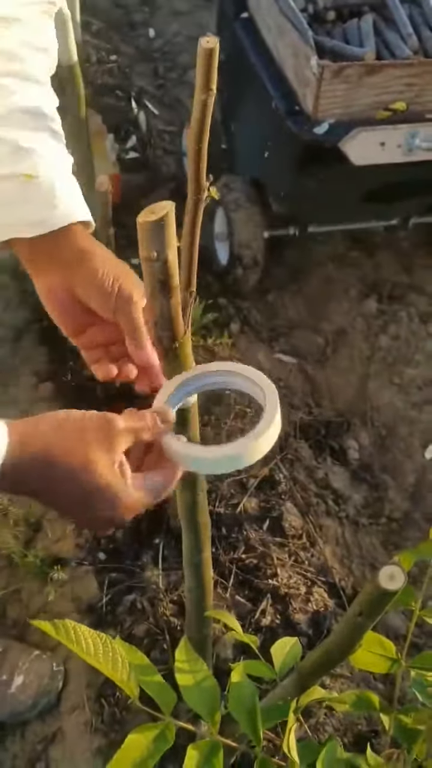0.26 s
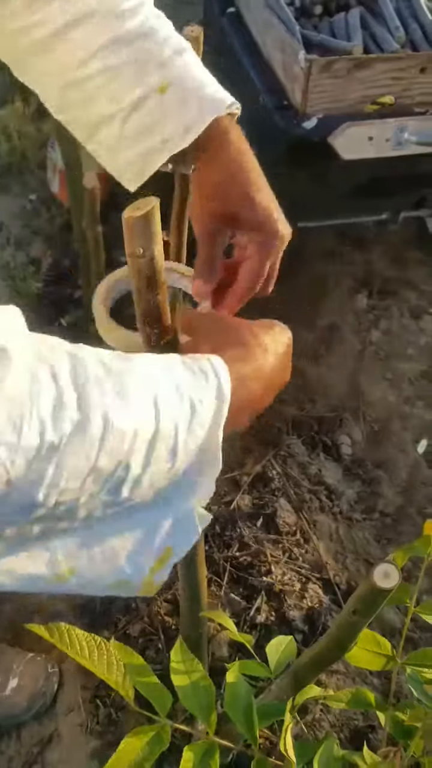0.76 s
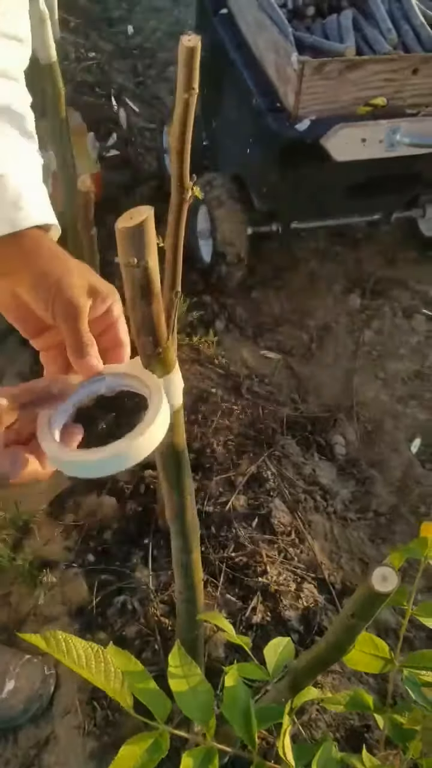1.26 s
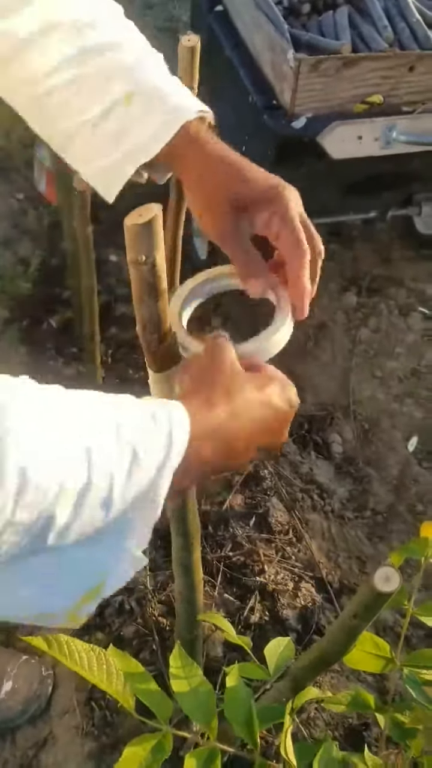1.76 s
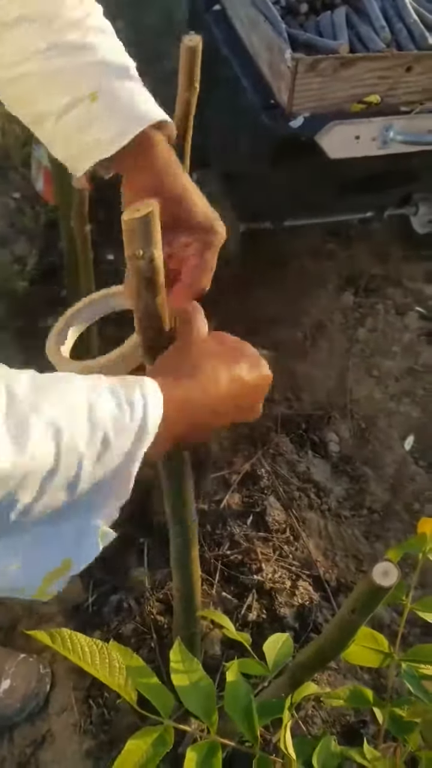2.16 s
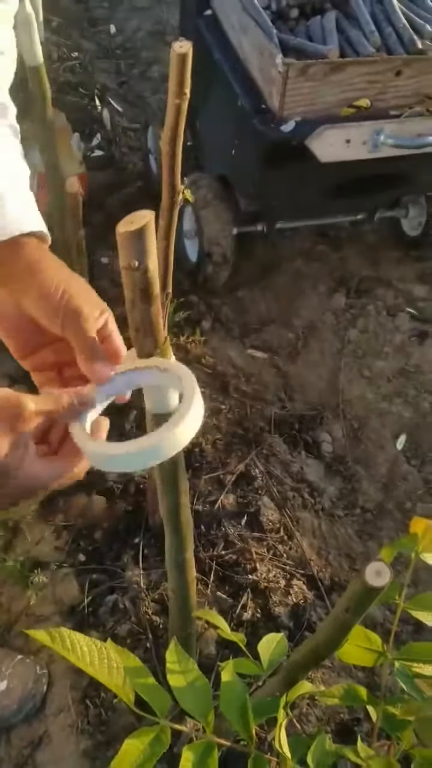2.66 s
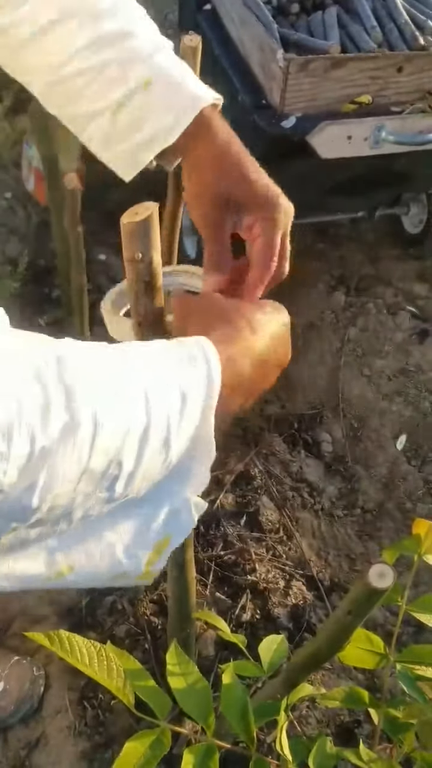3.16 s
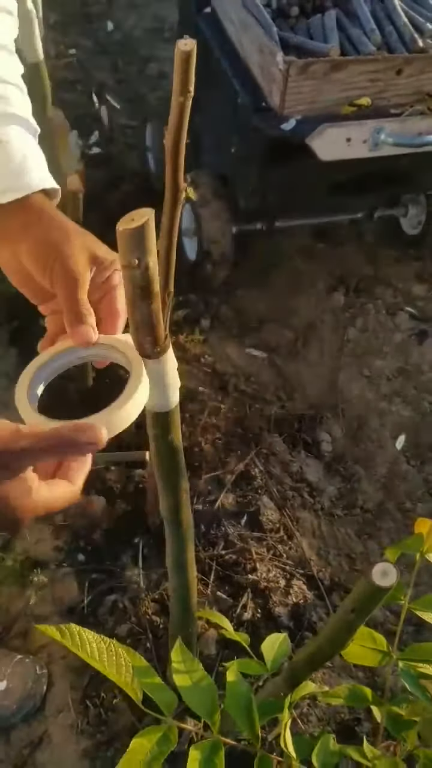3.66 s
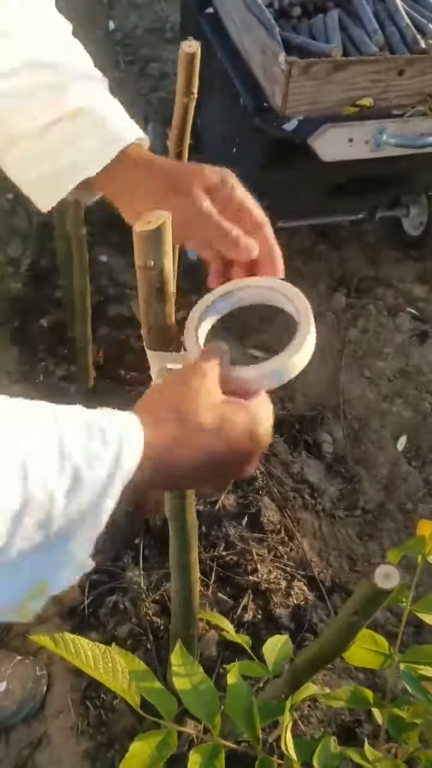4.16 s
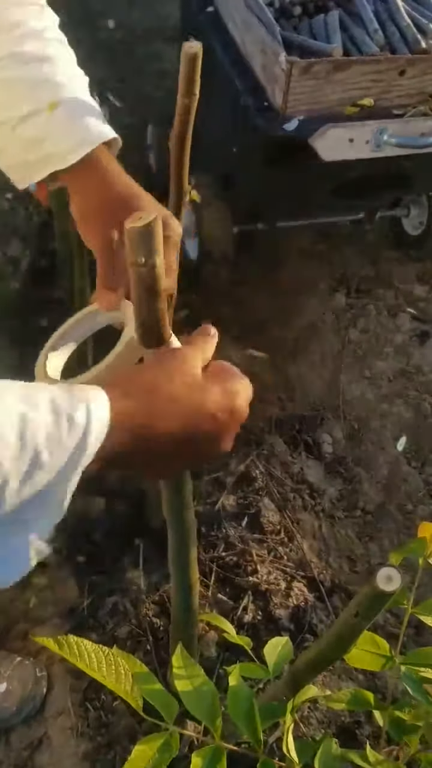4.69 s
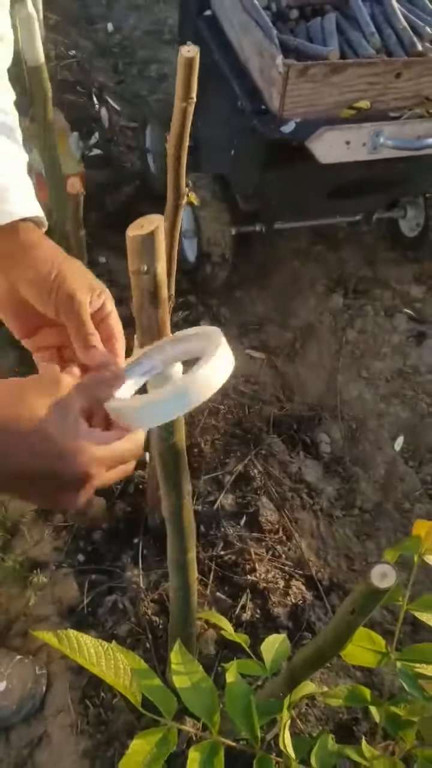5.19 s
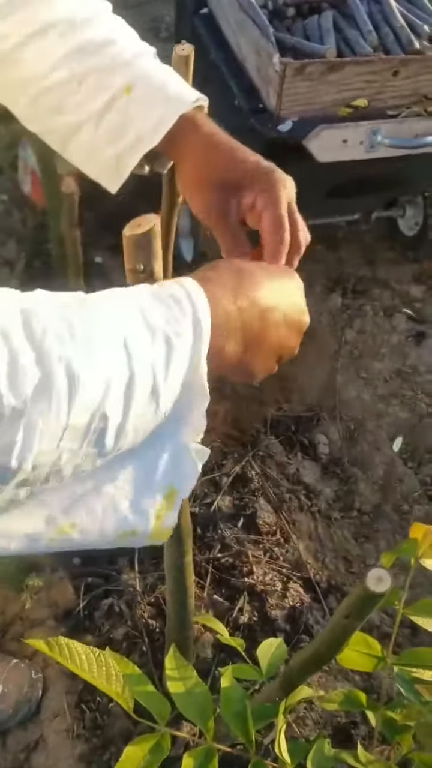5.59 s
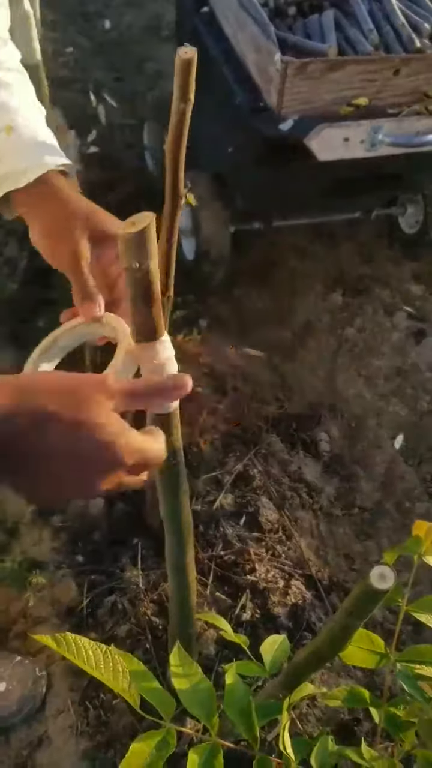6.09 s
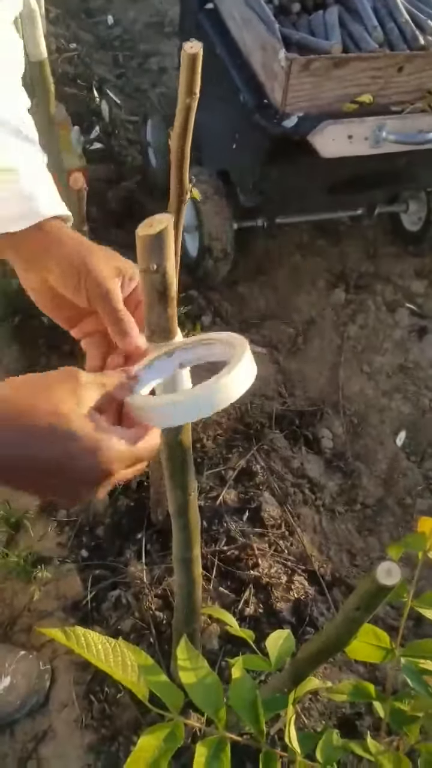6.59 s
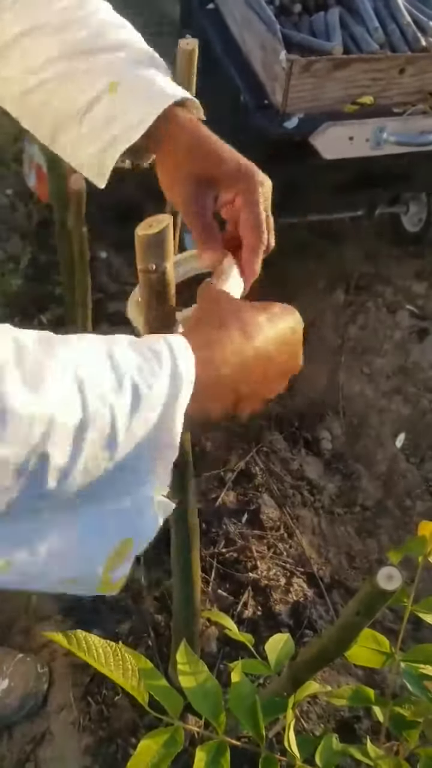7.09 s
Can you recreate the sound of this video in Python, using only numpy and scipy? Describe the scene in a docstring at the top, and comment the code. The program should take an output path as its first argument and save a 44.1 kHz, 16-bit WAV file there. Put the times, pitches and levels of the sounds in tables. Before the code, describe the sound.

Adhesive tape jerks off its roll around a plant stem, crackling and ripping in bright dry snaps, with soft low pops and faint outdoor drone.

```python
"""Outdoors, close to a phone: adhesive tape is peeled off a roll in jerks and wound round a stem.
The glue lets go in short snaps and longer rips over a finer crackle, all made as noise under tear envelopes.
The left microphone port is open and rings in the treble. The right one is covered: it hears the tape dull
and catches low pops of air, made as short cosine pulses. A far drone, filtered noise with a thin unsteady hum,
fills the field."""
import sys
import numpy as np
from scipy import signal
from scipy.fft import rfft, irfft, next_fast_len
from scipy.io import wavfile
from scipy.ndimage import uniform_filter1d, map_coordinates

SR = 44100
rng = np.random.default_rng(int(sys.argv[2]) if len(sys.argv) > 2 else 0)


def ratio(d):
    """dB to gain"""
    e = np.asarray(d, float) / 20
    return 10 ** e


def master(y):
    """Save y as 16-bit WAV."""
    cut = np.clip(np.atleast_2d(y).T, -1, 1)
    pcm = np.round(cut * 32767)  # scale
    wavfile.write(sys.argv[1], SR, pcm.astype(np.int16))


N = 323694

# borders between the ranges of tone: f/Hz
TONE_BORDERS = np.array([1500, 2700, 4600, 7600, 11000, 13300])
# frequency response of the open microphone port: f/Hz, gain/dB
OPEN_PORT = [(400, -24), (900, -17.5), (1500, -16), (2150, -10.5), (3000, -18), (4700, -10.5), (5600, -3),
             (6080, 2), (6700, -7), (8200, -20), (9700, -6), (12900, -15), (14000, -27), (16400, -70)]
RANGES = len(TONE_BORDERS) + 1
REST_DB = -46  # the crackle between pulls


def tape():
    """Amplitude modulation: snaps, rips and crackle gate noise; one row for the sound sent towards each port."""
    # short snaps, loud and faint, where the glue lets go at once: t/s, relative level/dB
    snap_rows = [(0.093, -13), (0.1034, -14), (0.1524, -3.5), (0.1634, -7), (0.2328, -17.0), (0.24, -25),
                 (0.2531, -15.5), (0.2673, -17), (0.2818, -14), (0.296, -12), (0.5608, -23), (0.7629, -12),
                 (0.7825, -9), (0.79, -16.0), (0.8118, -9.5), (0.823, -8), (0.8298, -19), (0.8359, -21),
                 (0.8501, -18), (0.9109, -17.5), (1.0659, -14.5), (1.0945, -20), (1.1215, -9),
                 (1.1452, -7.5), (1.1672, -13.5), (1.1875, -14), (1.2233, -10), (1.2514, -14), (1.2691, -8),
                 (1.3506, -13), (1.4087, -16), (1.423, -13), (1.4348, -10), (1.4871, -18), (1.503, -22.5),
                 (1.5301, -19.5), (1.5473, -17.5), (1.5798, -20.5), (1.692, -43), (1.7029, -26.5),
                 (1.7522, -21.5), (1.7865, -13), (1.8909, -15), (2.055, -17), (2.068, -22), (2.0752, -13),
                 (2.0901, -15), (2.0993, -11.0), (2.1062, -12.5), (2.1088, -24), (2.1162, -7), (2.14, -19),
                 (2.1637, -12.5), (2.1783, -13), (2.2367, -9.5), (2.2644, -16), (2.3642, -13.5),
                 (2.3902, -22), (2.4241, -19), (2.449, -19), (2.4596, -21), (2.4736, -19.0), (2.524, -14.5),
                 (2.535, -15), (2.5489, -15), (2.7754, -22), (2.8205, -21), (2.9182, -19.5), (2.9268, -26),
                 (2.9481, -18.0), (3.1435, -17.5), (3.2362, -14.5), (3.2559, -9.5), (3.3057, -29),
                 (3.32, -8), (3.3712, -9), (3.3757, -24), (3.3876, -8), (3.4412, -22), (3.5048, -14),
                 (3.5383, -13), (3.5745, -12.5), (3.5916, -19), (3.6248, -16.5), (3.6479, -16),
                 (3.6598, -14.5), (3.6804, -8.5), (3.6953, -15), (3.7529, -5.5), (3.838, -12.5),
                 (3.8421, -7.5), (3.978, -16), (4.0052, -15.5), (4.0141, -23), (4.0304, -13.5),
                 (4.0377, -12), (4.0499, -13.5), (4.0601, -9.5), (4.0719, -17.0), (4.0822, -15.5),
                 (4.1394, -23), (4.1427, -27), (4.1504, -34), (4.1787, -19), (4.4584, -19.5),
                 (4.5215, -16.5), (4.5363, -15), (4.5528, -14), (4.5609, -11.5), (4.5647, -9),
                 (4.5735, -22), (4.5908, -11.5), (4.6166, -13), (4.7686, -19), (4.7997, -17), (4.873, -14),
                 (4.8839, -16.5), (4.9035, -10), (4.9274, -12), (4.9455, -14), (4.9646, -9), (5.006, -14),
                 (5.0135, -19.0), (5.0746, -8), (5.0824, -12), (5.1472, -13.5), (5.1502, -6),
                 (5.2012, -17.0), (5.2069, -15), (5.216, -19), (5.2301, -13), (5.2646, -16.5),
                 (5.5455, -19.5), (5.5724, -20), (5.679, -24.5), (5.7128, -17), (5.739, -15.5),
                 (5.7792, -15.5), (5.8277, -19), (5.8438, -19.5), (5.8725, -25), (5.8908, -24),
                 (6.0488, -21.5), (6.2769, -13.5), (6.412, -8), (6.4162, -4.5), (6.5249, -7.5),
                 (6.5772, -13.5), (6.6763, -14.5), (6.6967, -13.5), (6.7233, -18), (6.772, -17.5),
                 (6.7916, -21), (6.8103, -17), (6.8657, -21), (6.8954, -23.5), (6.9154, -21.5),
                 (6.9327, -14.5), (6.9538, -16.5), (6.9692, -16), (6.9863, -21), (7.0421, -21.5),
                 (7.0762, -24.5)]
    # the glue lets go over a stretch: t/s, relative level/dB, length/ms
    rip_rows = [(0.7032, -21.5, 4.1), (0.9014, -22.5, 7.6), (1.733, -32, 29), (1.793, -20.5, 9.3),
                (1.9548, -26, 8.5), (2.1316, -22.5, 3.5), (2.601, -18, 6.6), (3.18, -23.5, 7.9),
                (3.4201, -14.5, 3.5), (3.4631, -17, 7.1), (3.9359, -19.5, 5.9), (4.4718, -23.5, 4.3),
                (4.622, -28, 16), (4.8124, -18, 8), (5.0304, -16.5, 7), (5.605, -31, 27),
                (6.2073, -28.5, 8), (6.2699, -20, 6), (6.593, -28, 5.2), (6.621, -27, 5.1)]
    # the free span of tape drums and rustles more or less from moment to moment: t/s, drumming/dB, rustling/dB
    span_rows = [(0.0, 6.5, -6.5), (0.4, -5, 3), (0.78, -6, -9.5), (0.95, 3.5, -0.5), (1.43, -2, -3.5),
                 (1.67, -1.5, 5.5), (1.8, -9, -2.5), (2.05, 0.5, -5), (2.2, -6.5, -4), (2.54, 2, 1),
                 (3.4, -3.5, -4), (3.69, 4, -1.5), (4.2, -6.5, -2), (5.03, 3, -3.5), (5.5, -2, -1.5),
                 (6.2, -3.5, 7), (6.5, -6, -1.5), (7.34, 3, 0.5)]

    snaps = np.column_stack([snap_rows, np.ones(len(snap_rows))])  # each 1 ms long
    ragged_db = 5 * np.tanh(wobble(350))  # a rip tears unevenly
    shape = bursts(snaps, tint_db=1.5) + bursts(rip_rows, tint_db=3.5) * ratio(ragged_db)
    shape[0] *= ratio(-10.5)  # sudden tears are thin in the low tones
    shape += crackle()
    drum_db, rustle_db = over_time(span_rows)
    shape[:2] *= ratio(drum_db)
    shape[4:] *= ratio(rustle_db)
    shape[-1] *= ratio(-10)  # turn down the range above 13.3 kHz

    near, other = shifting(rng.standard_normal((2, N)), patchy_db=4)
    tear = np.array([near, near + 1.37 * other])  # the two ports hear partly different noise
    return filtered(shape * tear[:, None], range_gains).sum(axis=1)


def range_gains(hz):
    """Complementary band splitting: differences of steep low-passes, whose gains add up to one."""
    below = 1 / (1 + (hz / TONE_BORDERS[:, None]) ** 48)
    return np.diff(below, axis=0, prepend=0, append=1)


def bursts(rows, tint_db):
    """Exponential decay of short tears, range by range: no two strips of glue have the same colour."""
    shiver_db = np.pad(5 * np.tanh(wobble(250)), (0, SR))
    lead = SR // 250  # each burst has a short fade-in
    t = np.arange(-lead, SR // 32) / SR
    shape = np.zeros((RANGES, N + SR))
    # time to fall by 60 dB: the low tones die more slowly
    ring_s = 0.005 * np.clip(4600 / np.r_[TONE_BORDERS, SR], 1, 1.5)[:, None]
    tints = np.clip(rng.standard_normal((len(rows), RANGES)), -2, 2)
    tints[:, 3] = 0  # the loudest range keeps the level of the tear
    for (s, db, ms), tint in zip(rows, tints):
        start = round(s * SR)
        fade_in = np.clip(0.001 - t, 0, None) / 0.0055
        decay = np.clip(t - ms / 1000, 0, None) / ring_s
        burst = ratio(-60 * (fade_in + decay))
        # the freed tape shivers on, unevenly
        flutter = ratio(-18 - 60 * t / 0.045 + shiver_db[start:][:len(t)]) * (t > 0)
        shape[:, start:][:, :len(t)] += ratio(db + tint_db * tint)[:, None] * (burst + flutter)
    return shape[:, lead:lead + N]


def crackle():
    """Random point process: threads of glue tick over a hiss; the harder the peel, the more they melt into it."""
    peel_db = peel()
    chance = rng.random((1600, 3))
    tick_s = chance[:, 0] * N / SR
    tick_db = -5 + 16 * chance[:, 1] ** 2.4
    tick_ms = 1 + 2 * chance[:, 2] ** 2
    ticks = np.transpose([tick_s, tick_db, tick_ms])
    taut = np.clip((peel_db - REST_DB) / 4, 0.1, 1)  # slack tape hardly ticks
    melt_db = np.clip(2 * (peel_db + 32.5), -12, 14)  # hiss over ticks
    range_wobble_db = [2 * wobble(40) for _ in range(RANGES)]
    hiss = ratio(melt_db + 2 * wobble(60) + range_wobble_db)
    shape = ratio(peel_db) * (taut * bursts(ticks, tint_db=8.0) + hiss) / (1 + ratio(melt_db))
    shape[-1] *= ratio(-19)  # turn the crackle down above 13.3 kHz
    return shape


def peel():
    """Stick-slip motion: each pull catches fast, slides from its first crackle level to its last and goes slack."""
    # the hand draws tape off the roll: start t/s, length/s, crackle level at the start/dB, at the end/dB
    pull_rows = [(0.228, 0.21, -38.5, -38.5), (0.424, 0.069, -55, -31.5), (0.556, 0.074, -45.5, -32.5),
                 (0.663, 0.13, -34, -43), (0.806, 0.068, -47, -29), (0.958, 0.15, -46.5, -41),
                 (1.495, 0.25, -39, -37), (1.807, 0.098, -47.5, -37.5), (2.016, 0.15, -39, -39),
                 (2.145, 0.62, -39.5, -46), (2.735, 0.06, -47, -31.5), (2.832, 0.024, -33, -27),
                 (2.93, 0.04, -24, -42), (2.957, 0.021, -51, -24), (3.039, 0.055, -36.5, -31),
                 (3.148, 0.31, -45, -40.5), (3.961, 0.23, -46.5, -29), (4.293, 0.072, -43.5, -35.5),
                 (4.406, 0.11, -28.5, -44), (4.526, 0.11, -70, -33.5), (5.206, 0.076, -30, -46),
                 (5.333, 0.16, -38, -31.5), (5.526, 0.1, -40, -34.5), (5.79, 0.11, -39, -30),
                 (6.576, 0.045, -37, -25.5), (6.65, 0.4, -43, -41.5), (7.065, 0.17, -44, -21.5),
                 (7.245, 0.021, -40, -34)]
    catch_db_per_s, slack_db_per_s = 1500, 613
    t = np.arange(N) / SR
    peel_db = np.full(N, float(REST_DB))
    for s, length, first_db, last_db in pull_rows:
        held_db = np.interp(t, [s, s + length], [first_db, last_db])
        catch_db = catch_db_per_s * np.clip(s - t, 0, None)
        slack_db = slack_db_per_s * np.clip(t - s - length, 0, None)
        peel_db = np.maximum(peel_db, held_db - catch_db - slack_db)
    return peel_db


def shifting(noise, patchy_db):
    """Resonance: narrow tones come and go as the free span of tape bends and changes length."""
    z = signal.stft(noise, nperseg=512)[2]
    patches = uniform_filter1d(rng.standard_normal(z.shape[1:]), size=3, axis=0)  # smooth over frequency
    patches = uniform_filter1d(patches, size=4, axis=1)  # and over time
    gain = ratio(patchy_db * patches / patches.std())
    heard = ratio(2 * along(OPEN_PORT, np.fft.rfftfreq(512, 1 / SR))[0])  # power through the open port
    gain /= np.sqrt(heard @ gain ** 2)  # the colour shifts, the loudness stays
    out = signal.istft(z * gain, nperseg=512)[1][:, :N]
    return out / out.std()


def open_port(x):
    """Minimum-phase resonance: the open port rings in the treble."""
    return filtered(x, causal(OPEN_PORT))


def covered_port(x):
    """Transmission loss and delay: under its cover the port hears dull and answers a little late."""
    # frequency response of the covered port: f/Hz, gain/dB
    cover_points = [(400, -37), (1200, -20), (2500, -30), (3100, -57.5), (4400, -46), (8500, -122),
                    (12500, -56.5)]
    late_s = 0.00004
    return filtered(x, lambda hz: causal(cover_points)(hz) * np.exp(-2j * np.pi * hz * late_s))


def pops():
    """Pressure pulse: a push or suck of air of about one cycle wobbles out; weak ones come at random between."""
    # air pops on the covered port: t/s, level/dB, f/Hz
    strong = [(0.3477, -28, 212), (0.942, -22, 144), (1.0679, -21.5, 200), (1.214, -20, 140),
              (1.606, -13, 144), (1.7666, -21.5, 145.5), (1.9818, -25, 147), (2.022, -26, 120),
              (2.4205, -24, 191), (2.4687, -13, 153), (3.0794, -22.5, 192), (3.215, -20, 164),
              (3.98, -23.5, 183), (4.458, -25, 173), (4.867, -13, 166), (5.213, -23, 174),
              (5.272, -25.5, 189), (5.7809, -18.5, 220), (6.1438, -21.5, 173), (6.8002, -24.5, 151),
              (6.9215, -14, 212), (6.973, -24, 190), (7.026, -25.5, 181), (7.203, -26.5, 190)]
    chance = rng.random((70, 3))
    weak = np.transpose([chance[:, 0] * N / SR, -43 + 12 * chance[:, 1], 110 + 190 * chance[:, 2]])
    phases = np.r_[rng.normal(0, 1.2, len(strong)), rng.normal(0, 0.7, len(weak))]
    half = SR // 25  # samples on either side of the middle of a pop
    t = np.arange(-half, half) / SR
    out = np.zeros(N + SR)
    for (s, db, hz), phase in zip([*strong, *weak], phases):
        bell = np.exp(-np.abs(t * hz / 0.63) ** 6.4)
        tail = 0.23 * np.exp(-np.abs(t) / 0.0087) * np.clip(t * hz, 0, 1)
        body = (bell + tail) * np.cos(2 * np.pi * hz * t + phase)
        edge = 0.95 * np.exp(-(t * hz / 0.13) ** 2) * np.cos(2 * np.pi * 0.86 * hz * t + 3 * phase)
        out[round(s * SR):][:len(t)] -= ratio(db) * (body + edge)
    return out[half:][:N]


def field():
    """Diffuse-field coherence: far rumble and hiss are nearly alike in the bass, unlike above; a thin hum wavers."""
    # noise spectrum: f/Hz, left density/dB per Hz, right density/dB per Hz
    density = [(25.3, -103, -88), (59.6, -69.5, -70), (136.6, -67.5, -68.5), (247, -86.5, -86),
               (510, -81.5, -88.5), (1090, -87.5, -95.5), (2070, -92, -105), (3220, -101, -122),
               (5970, -110, -125), (13000, -106, -122), (13700, -135, -140)]
    # left-right correlation: f/Hz, coefficient
    likeness = [(40, 1), (200, 0.58), (1500, 0.0058)]

    def mid_side_gains(hz):
        angle = np.arccos(np.clip(along(likeness, hz)[0], -1, 1)) / 2
        return np.array([np.cos(angle), np.sin(angle)])

    mid, side = filtered(rng.standard_normal((2, N)), mid_side_gains)
    pair = np.array([mid + side, mid - side])
    air = filtered(pair, lambda hz: ratio(along(density, hz)) * np.sqrt(SR / 2))
    hum_hz = 552 + 1.59 * wobble(8)
    swell_db = 4 * wobble(4)
    hum = ratio(-64 + swell_db) * np.sin(2 * np.pi * np.cumsum(hum_hz) / SR)
    return air + hum * ratio([[0], [-5]])


def along(points, hz):
    """Logarithmic frequency scale: interpolates each column of (Hz, value, ..) points on it."""
    f, *cols = np.transpose(points)
    return np.array([np.interp(np.log(hz + 1), np.log(f + 1), c) for c in cols])


def over_time(rows):
    """Linear interpolation: one value per sample for each column after the time."""
    s, *cols = np.transpose(rows)
    return [np.interp(np.arange(N) / SR, s, c) for c in cols]


def wobble(rate):
    """Band-limited randomness: a smooth curve through random knots, rate knots a second (400 at most)."""
    knots = rng.standard_normal(int(N * 400 / SR) + 4)
    return map_coordinates(knots, [np.arange(N) * rate / SR])


def filtered(x, response):
    """Convolution theorem: the spectrum of x times a response of frequency."""
    m = 2 * next_fast_len(N // 2 + SR // 4)  # padded so that ringing does not wrap round
    return irfft(rfft(x, m) * response(np.fft.rfftfreq(m, 1 / SR)), m)[..., :N]


def causal(points):
    """Minimum phase by the folded cepstrum: the response rings after a click, not before."""
    def response(hz):
        cepstrum = irfft(np.log(ratio(along(points, hz)[0])))
        cepstrum[1:len(hz) - 1] *= 2
        cepstrum[len(hz):] = 0
        return np.exp(rfft(cepstrum))
    return response


def scene():
    """Superposition: the tape through each port, the pops (faint on the left) and the far field."""
    rasp = tape()
    ports = np.array([open_port(rasp[0]), covered_port(rasp[1])])
    return ratio(10.5) * ports + pops() * ratio([[-30], [0]]) + field()


def roll_off(x):
    """The treble ends steeply here."""
    return signal.sosfilt(signal.butter(12, 16490, fs=SR, output="sos"), x)


def record(dry):
    """Soft saturation: the phone rounds off the hardest peaks."""
    rounded = np.tanh(dry)
    return roll_off(rounded)


dry = scene()
out = record(dry)
master(out)
```